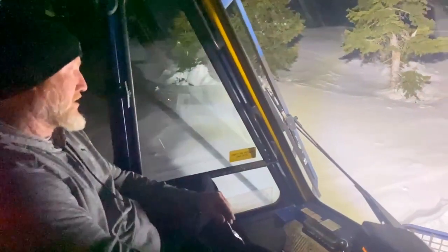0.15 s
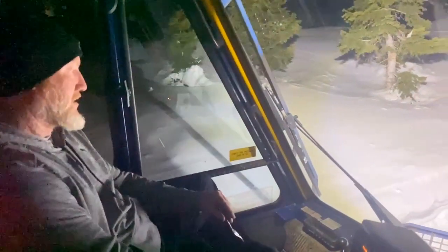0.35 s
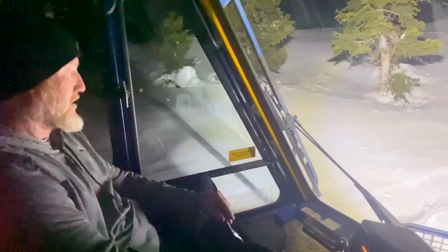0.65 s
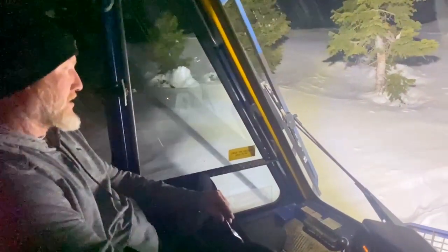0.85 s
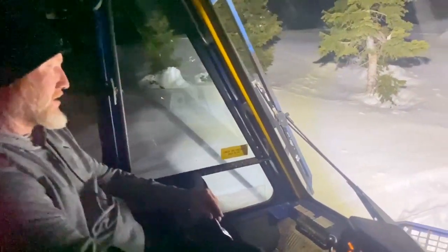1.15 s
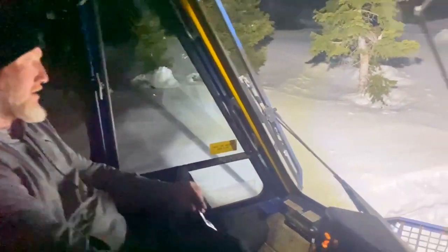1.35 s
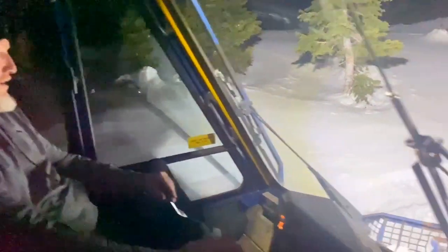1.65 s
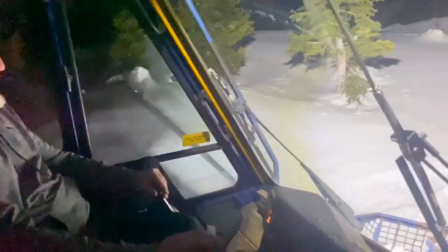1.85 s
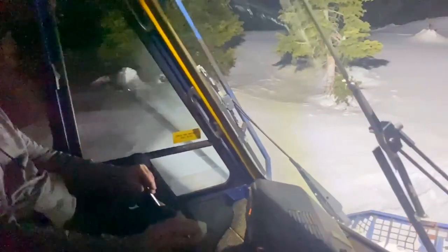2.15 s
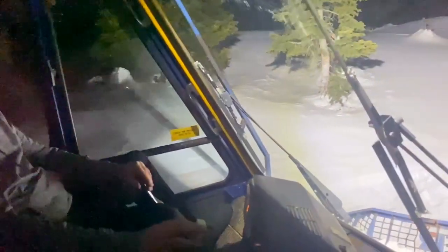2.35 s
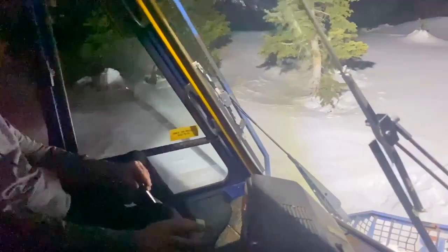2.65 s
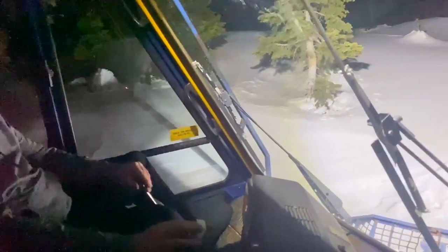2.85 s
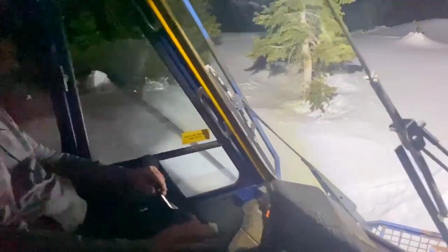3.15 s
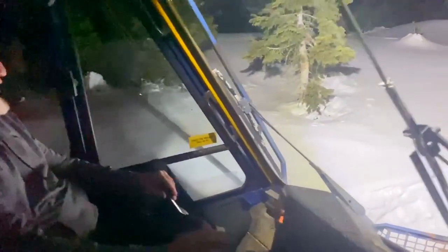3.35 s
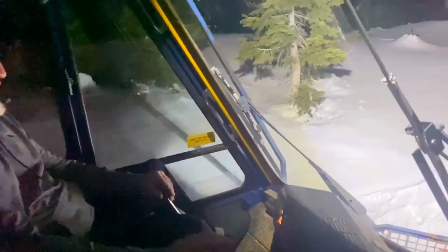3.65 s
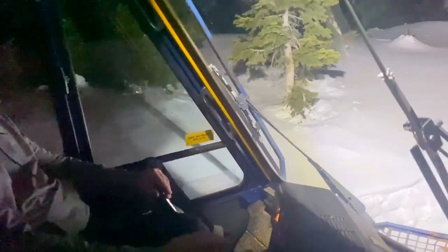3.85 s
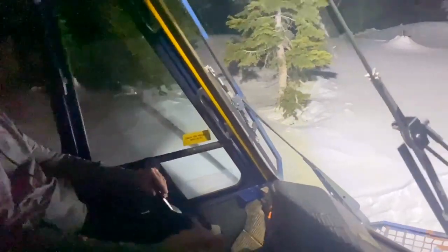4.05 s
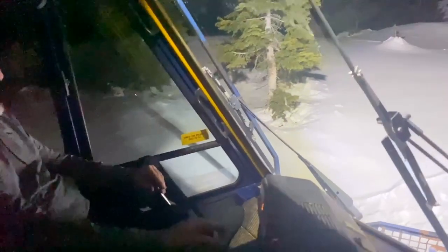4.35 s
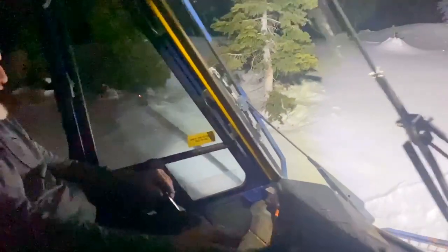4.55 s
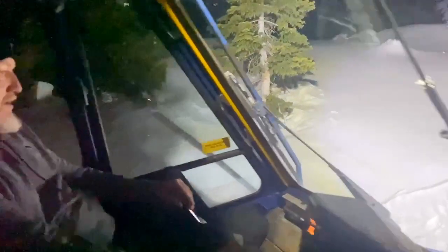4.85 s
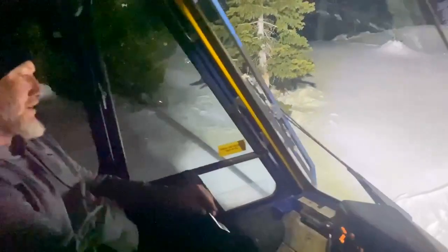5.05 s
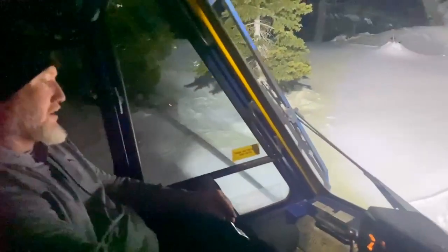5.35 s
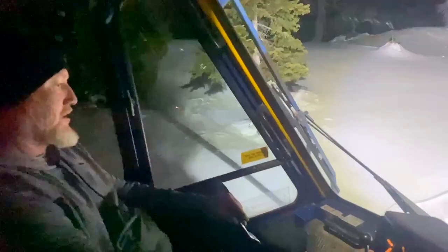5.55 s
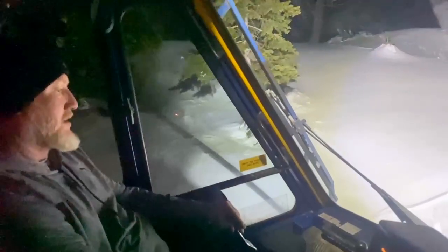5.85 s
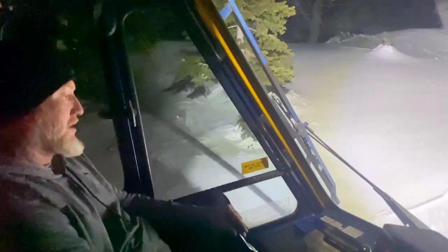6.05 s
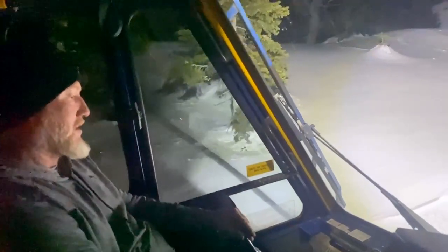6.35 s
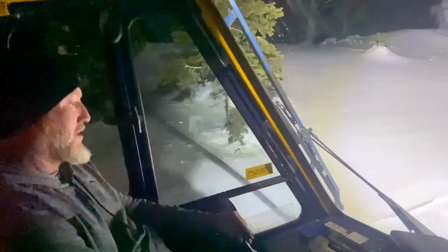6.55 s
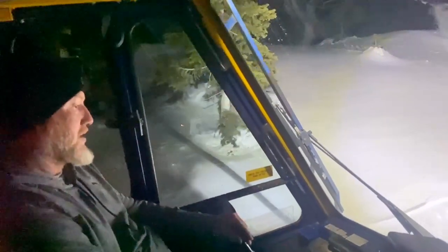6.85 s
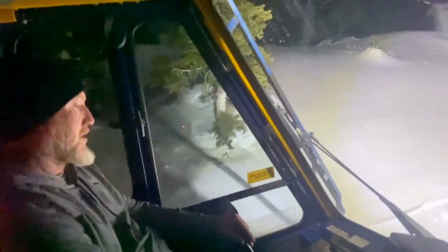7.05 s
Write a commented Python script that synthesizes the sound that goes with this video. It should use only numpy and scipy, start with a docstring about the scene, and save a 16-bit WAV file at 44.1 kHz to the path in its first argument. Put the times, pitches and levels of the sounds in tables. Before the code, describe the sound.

A diesel engine drones steadily for about seven seconds, heard from inside the cab of a tracked snow vehicle. It has a fine clatter and a slight whine, over low, throbbing track rumble and a faint hiss of air. A small catch snaps at about 0.9 seconds, and a sharp tick follows at 2 seconds. From around 1.7 seconds a low hydraulic hum swells, joined by a faint grinding of packed snow; both hold until about 5 seconds and fade by 6. A panel knocks lightly at 3 seconds. The engine's pitch sags very slightly, lowest near 6 seconds, then recovers. Clothing rustles softly close by, mostly between 2 and 3.5 seconds and again from 4.7 seconds on. Loose fittings click faintly between 5.4 and 6 seconds, then give a sharper double clack at about 6.4 seconds. The drone continues to the end.

```python
"""Snowcat cab, slow turn in snow.

The six-cylinder diesel drones in harmonics of its cycle, clatters at each firing and sets a panel ringing.
The hydraulic drive hums under steering load. Wheels rumble, track cleats beat, packed snow grinds.
Clothing rustles close by over a hiss of air; loose fittings click and knock now and then."""
import sys
import numpy as np
from scipy import signal
from scipy.fft import rfft, irfft
from scipy.io import wavfile
from scipy.ndimage import map_coordinates

SR = 44100
rng = np.random.default_rng(int(sys.argv[2]) if len(sys.argv) > 2 else 0)


def persist_wave(psi):
    """Save psi, clipped to +-1, as 16-bit WAV."""
    counts = np.round(np.clip(psi, -1, 1) * 32767).astype(np.int16)
    wavfile.write(sys.argv[1], SR, np.atleast_2d(counts).T)


N = 317079
T = np.arange(N) / SR
HZ = np.fft.rfftfreq(N, 1 / SR)

# crankshaft speed: time_s, speed_rpm
ENGINE_SPEED = [(0.0, 2096), (0.4, 2090.5), (1.4, 2098.5), (1.8, 2086.5), (2.4, 2080), (2.7, 2084),
                (3.5, 2067), (4.0, 2081.5), (4.7, 2083), (5.3, 2058), (6.0, 2047.5), (6.4, 2070),
                (7.2, 2087)]
# strong engine lines: multiple_of_cycle, level_db
ENGINE_ORDERS = [(1, -45.5), (2, -36.2), (7, -38.1), (8, -38.4), (9, -33.1), (12, -42.5), (15, -42.2),
                 (18, -42.2), (20, -37.7), (21, -43.0), (26, -47.1), (30, -43.7), (32, -43.4), (38, -43.8),
                 (41, -46.6), (47, -51.0), (54, -54.0), (56, -51.1), (66, -53.0), (69, -54.2), (73, -52.2),
                 (78, -56.0)]
# weak lines radiated by the block: freq_hz, line_level_db
BLOCK_SPECTRUM = [(170, -46.5), (400, -48.5), (700, -53), (900, -60), (1250, -58), (1600, -63.5),
                  (2500, -67.5), (3500, -76.5), (5000, -94)]
# combustion noise: freq_hz, relative_db
CLATTER_SPECTRUM = [(300, -26), (600, 7.5), (950, -1.5), (1200, 4), (1700, -5.5), (2500, -8.5),
                    (3500, -15.5), (5000, -21.5), (9000, -25.5)]
# running gear heard through the cab: freq_hz, relative_db
RUMBLE_SPECTRUM = [(12, -26), (28, -10), (45, 2), (70, 2.5), (125, 0), (170, -2), (225, -10), (310, -12),
                   (365, -8), (410, -17.5), (480, -18), (590, -15), (730, -18.5), (900, -30.5),
                   (1600, -49.5)]
# sliding cloth: freq_hz, relative_db
CLOTH_SPECTRUM = [(500, -18), (1500, 8), (4500, 5.5), (6800, 8.5), (9000, 6.5), (12200, 1), (14500, 6),
                  (15700, 3), (16000, -23)]
# cloth strokes: peak_s, swell_s, fade_s, relative_db
CLOTH_STROKES = [(.04, 0.13, 0.1, -39), (.42, 0.16, 0.23, -48.5), (1.8, .11, .12, -48.5),
                 (2.24, 0.099, 0.26, -40), (2.55, 0.075, 0.12, -40.5), (2.69, 0.042, 0.04, -41.5),
                 (2.86, 0.12, 0.16, -38.5), (3.33, 0.087, 0.22, -36.5), (3.88, 0.21, 0.13, -47.5),
                 (4.73, .055, 0.095, -39), (5.17, 0.083, 0.25, -42), (5.46, 0.094, 0.091, -40),
                 (5.64, 0.069, 0.097, -39), (5.88, 0.11, 0.057, -41.5), (6.05, 0.12, 0.069, -41.5),
                 (6.8, 0.16, 0.081, -36.5)]
# cab air: freq_hz, relative_db
AIR_SPECTRUM = [(500, -5), (2000, 12), (4200, 1), (5200, 1), (7000, 3.5), (9000, -1.5), (12000, -41),
                (14500, -3), (16000, 1)]

# blows: start_s, level_db, rise_s, decay_s, tilt_db_per_octave
FITTING_CLACKS = [(2.203, -30, .006, 0.015, -9), (5.408, -30, .006, .018, -8),
                  (5.612, -31.5, .006, 0.029, -7), (6.022, -28, .002, 0.017, 1),
                  (6.354, -13, 0.0068, 0.01, 1.5), (6.370, -12, 0.00064, 0.0093, 1)]
CATCH_SNAPS = [(.9155, -19.5, 0.0034, 0.0081, -2)]
SHARP_TICKS = [(1.010, -31, .0003, .001, 6), (1.999, -30, .0003, .002, 0),
               (2.035, -12.5, 0.00019, 0.0008, -1.5), (2.0927, -31, .0003, .001, 6),
               (2.1396, -27, .0003, .001, -8)]
PANEL_KNOCKS = [(2.959, -16, .0018, 0.011, -5.5), (2.968, -24, 0.0011, 0.0083, -9)]  # knock and rebound
# resonances of the struck parts: freq_hz, width_hz, relative_db
FITTING_MODES = [(1686, 166, 6), (2320, 370, 4), (2960, 330, 4.5), (3460, 400, 1.5), (4260, 690, -0.5),
                 (6400, 1200, -1), (7340, 590, 0), (8560, 440, -3), (9550, 430, -5), (10500, 840, -5.5),
                 (14200, 1600, -10)]
CATCH_MODES = [(1550, 340, -2), (2570, 280, -3), (3150, 340, 0.5), (3620, 260, 0), (4130, 230, -1),
               (6650, 1300, -10), (8250, 150, -5), (9200, 100, -7), (11900, 3000, -15)]
TICK_RESONANCES = [(3500, 3000, -6), (6500, 3200, 2), (13500, 3500, -2)]
PANEL_MODES = [(680, 69, 3), (840, 80, -4), (1020, 63, 0), (1430, 96, 0), (2190, 430, -10)]

# tone level under load: free_db, steer_change_db, lug_change_db
FIRING_DB, WHINE_DB, PANEL_SING_DB = (-22.5, -2.4, -2.4), (-29, -3, 2.4), (-45, -3.5, 4.9)
FREE_RPM, LUG_RPM = 2090, 2050  # no lugging, full lugging
TURN_START_S, TURN_END_S, TURN_ATTACK_S, TURN_RELEASE_S = 1.718, 5.94, 0.69, 0.8


def engine_drone(cycles, steer, lug, lean_db=7.0):
    """Six firings a cycle, a gear whine, and the lines that unequal cylinders add."""
    out = tone(6 * cycles, loaded_db(FIRING_DB, steer, lug) + 0.8 * drift(6))
    out += tone(22 * cycles, loaded_db(WHINE_DB, steer, lug) + 0.5 * drift(6))
    lean = {9: -1, 20: 1}  # steering weakens order 9, lifts order 20
    for order, level_db in ENGINE_ORDERS:
        shift_db = lean.get(order, 0) * lean_db * (steer - steer.mean())
        out += tone(order * cycles, level_db + shift_db + 1.8 * drift(3))
    return out


def engine_block(cycles, cycle_hz, count=290, size=16384):
    """The block radiates a dense comb of weak lines; two phase patterns blend at random."""
    orders = np.arange(count)
    gains = amp(spectrum_db(BLOCK_SPECTRUM, orders * cycle_hz)) * (orders > 0)
    phasors = np.exp(2j * np.pi * rng.random((2, count)))
    shapes = irfft(gains * phasors, size) * size / np.sqrt(2)
    first, second = (np.interp(cycles % 1, np.arange(size) / size, shape) for shape in shapes)
    blend_rad = 0.51 * drift(2.12)
    return first * np.cos(blend_rad) + second * np.sin(blend_rad)


def combustion_clatter(cycles, level_db=-39, depth=0.25, spread_db=9.0, decay_firings=0.21):
    """Each firing throws a noise burst; each cylinder has its own strength and timing."""
    firings = 6 * cycles + 0.15 * np.sin(2 * np.pi * cycles)
    strength = amp(spread_db * rng.permutation(np.linspace(-1, 1, 6)))
    cylinder = np.floor(firings).astype(int) % 6
    bursts = unit_rms(strength[cylinder] * np.exp(-(firings % 1) / decay_firings))
    return amp(level_db) * unit_rms(shaped_noise(CLATTER_SPECTRUM) * (1 - depth + depth * bursts))


def panel_sing(cycles, steer, lug):
    """Thin, fuzzy ring of a cab panel near 1100 Hz, excited by engine order 64; swells with lugging."""
    return tone(64 * cycles + 0.11 * drift(30), loaded_db(PANEL_SING_DB, steer, lug) + 1.2 * drift(30))


def hydraulic_hum(steer, hum_hz=189.8, sag_hz=4.2, waver_hz=0.56, throb_db=2.0):
    """The drive hums and throbs under steering load; it slips most in mid-turn."""
    progress = np.clip((T - TURN_START_S) / (TURN_END_S - TURN_START_S), 0, 1)
    pitch_hz = hum_hz - sag_hz * np.sin(np.pi * progress) ** 2 + waver_hz * drift(8)
    gain = amp(-42.5) + amp(-22.5) * steer  # idle + load
    return gain * tone(np.cumsum(pitch_hz) / SR, throb_db * drift(12))


def tracks(steer, rumble_db=-22.0, left_hz=61.9, right_hz=63.47, cleat_db=-28, grind_db=-44.5):
    """Cleats of two tracks beat over the wheel rumble; turning grinds the packed snow."""
    rumble = shaped_noise(RUMBLE_SPECTRUM) * amp(rumble_db + 0.66 * steer)
    cleats = sum(tone(hz * T + 0.061 * drift(4), cleat_db + drift(3.8)) for hz in (left_hz, right_hz))
    grind = amp(grind_db + 8.5 * steer) * band_noise(centre_hz=620, half_width_hz=180)
    return rumble + cleats + grind


def cloth_rustle(steer, gain_db=1.68, rest_db=-54, steer_db=6, flutter_db=0.93):
    """Cloth slides in strokes over a faint stir that grows in the turn."""
    power = amp(rest_db + steer_db * steer) ** 2
    for peak_s, swell_s, fade_s, stroke_db in CLOTH_STROKES:
        width_s = np.where(T < peak_s, swell_s, fade_s)
        power += (amp(stroke_db) * np.exp(-((T - peak_s) / width_s) ** 2)) ** 2
    return shaped_noise(CLOTH_SPECTRUM) * np.sqrt(power) * amp(gain_db + flutter_db * drift(90))


def impacts(blows, modes, size=8192):
    """Each blow is a short contact chatter that rings the modes of the struck part."""
    out = np.zeros(N + size)
    t = np.arange(size) / SR
    hz = np.fft.rfftfreq(size, 1 / SR) + 1
    lowest_hz = modes[0][0]
    body = sum((-1) ** k * amp(mode_db) / (1 + 1j * (hz ** 2 - mode_hz ** 2) / (hz * width_hz))
               for k, (mode_hz, width_hz, mode_db) in enumerate(modes))
    body /= (1 - 1j * lowest_hz / hz / 2) ** 2  # small parts radiate little bass
    for start_s, level_db, rise_s, decay_s, tilt_db_per_octave in blows:
        chatter = rng.choice([-1., 1.], size) * (1 - np.exp(-t / rise_s)) * np.exp(-t / decay_s)
        colour = body * amp(tilt_db_per_octave * np.log2(np.maximum(hz, lowest_hz)))
        colour /= np.sqrt(np.mean(abs(colour) ** 2))
        out[round(start_s * SR):][:size] += amp(level_db) * irfft(rfft(chatter) * colour)
    return out[:N]


def air_hiss(level_db=-45.0):
    """Steady hiss of cab air."""
    return amp(level_db) * shaped_noise(AIR_SPECTRUM)


def cab_reflections(x, wet=0.44, decay_s=0.01, gap_s=0.0015, density=0.1, size=2048):
    """Close reflections from glass and panels ripple the spectrum."""
    t = np.arange(size) / SR
    taps = rng.choice([-1., 1.], size) * (rng.random(size) < density)
    taps *= np.exp(-t / decay_s) * (t > gap_s)
    echoes = signal.fftconvolve(x, taps / np.linalg.norm(taps))[:N]
    return (x + wet * echoes) / np.hypot(1, wet)


def steering_load():
    """Attack, hold and release of the turn, 0 to 1."""
    return np.clip(np.minimum((T - TURN_START_S) / TURN_ATTACK_S, (TURN_END_S - T) / TURN_RELEASE_S), 0, 1)


def loaded_db(levels_db, steer, lug):
    """Tone level under steering and lugging."""
    free_db, steer_change_db, lug_change_db = levels_db
    return free_db + steer_change_db * steer + lug_change_db * lug


def amp(db):
    """Decibels to gain."""
    return 10 ** (np.asarray(db) / 20)


def unit_rms(x):
    """Scale to rms 1."""
    return x / np.sqrt(np.mean(x ** 2) + 1e-20)


def spectrum_db(points, hz):
    """Interpolate a spectrum over log frequency."""
    freq_hz, level_db = np.transpose(points)
    return np.interp(np.log(hz + 1), np.log(freq_hz + 1), level_db)


def noise(gain):
    """Unit-rms noise, weighted per frequency."""
    return unit_rms(irfft(rfft(rng.standard_normal(N)) * gain, N))


def shaped_noise(points):
    """Unit-rms noise with a tabled spectrum."""
    return noise(amp(spectrum_db(points, HZ)))


def band_noise(centre_hz, half_width_hz):
    """Unit-rms noise in one resonance."""
    return noise(1 / (1 + ((HZ - centre_hz) / half_width_hz) ** 2))


def drift(rate_hz):
    """Smooth random wander, spread about 1."""
    knots = rng.standard_normal(1024)
    return map_coordinates(knots, [T[::64] * rate_hz], order=3, mode="wrap").repeat(64)[:N]


def tone(phase_turns, rms_db):
    """Sine with a random start phase."""
    return np.sqrt(2) * amp(rms_db) * np.sin(2 * np.pi * (phase_turns + rng.random()))


def scene():
    """Engine, drive, tracks and small cab sounds, mono."""
    rpm = np.interp(T, *np.transpose(ENGINE_SPEED))
    steer = steering_load()
    lug = np.clip((FREE_RPM - rpm) / (FREE_RPM - LUG_RPM), 0, 1)
    cycle_hz = rpm / 120  # four-stroke: two crank turns a cycle
    cycles = np.cumsum(cycle_hz) / SR
    engine = engine_drone(cycles, steer, lug) + engine_block(cycles, cycle_hz.mean())
    engine += panel_sing(cycles, steer, lug)
    fittings = impacts(FITTING_CLACKS, FITTING_MODES) + impacts(CATCH_SNAPS, CATCH_MODES)
    fittings += impacts(SHARP_TICKS, TICK_RESONANCES) + impacts(PANEL_KNOCKS, PANEL_MODES)
    drive = hydraulic_hum(steer) + tracks(steer)
    cab_noise = cab_reflections(combustion_clatter(cycles) + cloth_rustle(steer) + air_hiss())
    return (engine + drive + cab_noise + fittings)[None]


def record(dry, cutoff_hz=15900):
    """Steep low-pass."""
    lowpass = signal.firwin(511, cutoff_hz, window=("kaiser", 9), fs=SR)
    return signal.oaconvolve(dry, lowpass[None], "same")


dry = scene()
out = record(dry)
persist_wave(out)
```